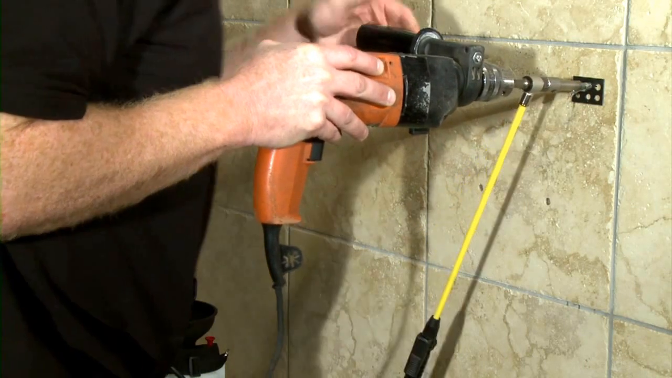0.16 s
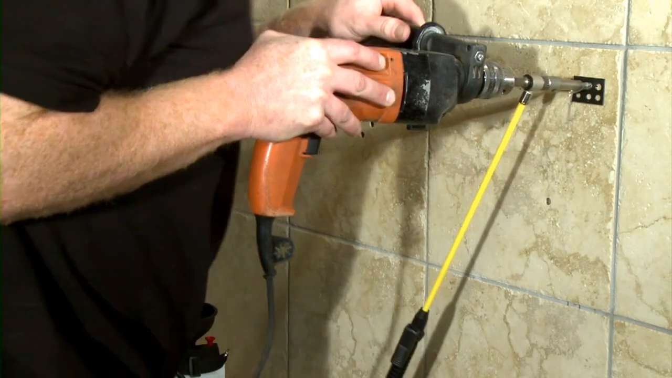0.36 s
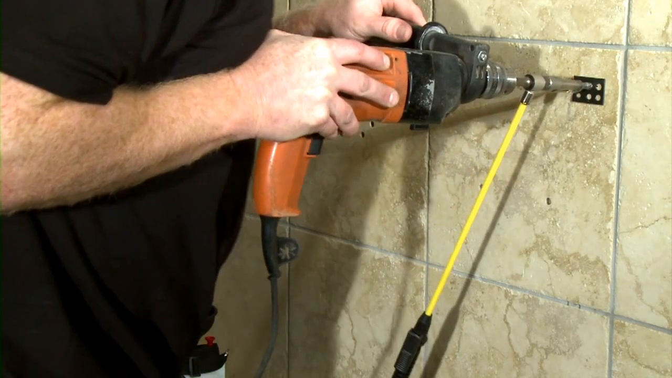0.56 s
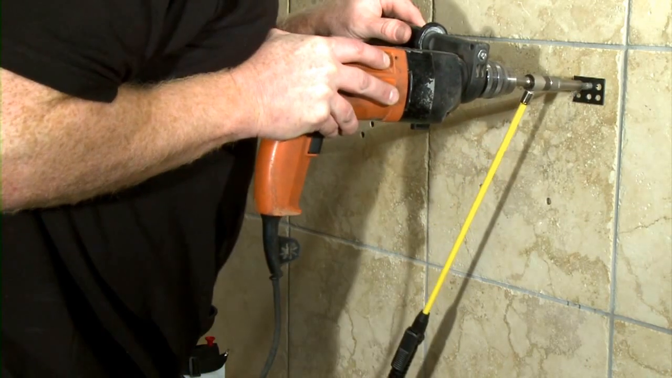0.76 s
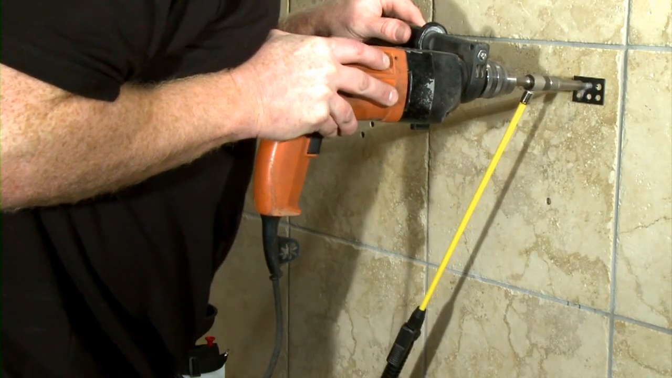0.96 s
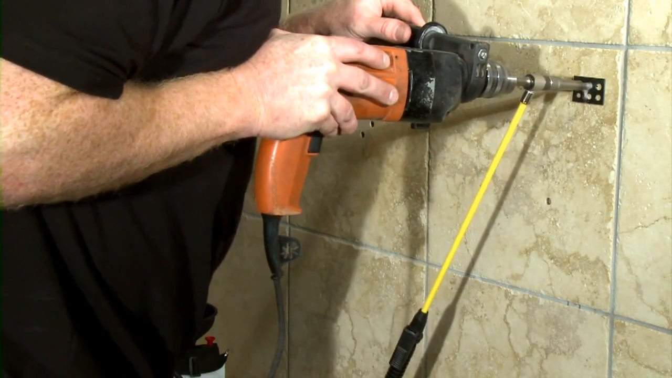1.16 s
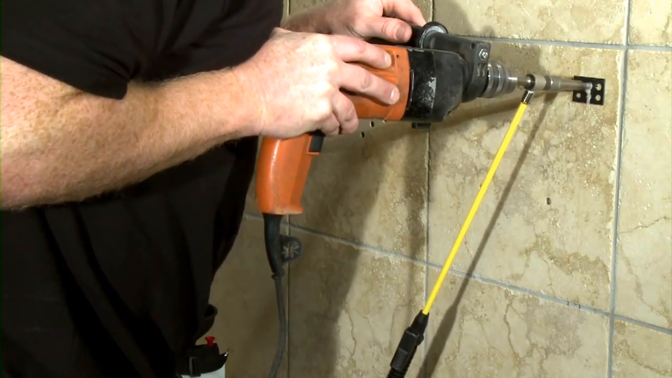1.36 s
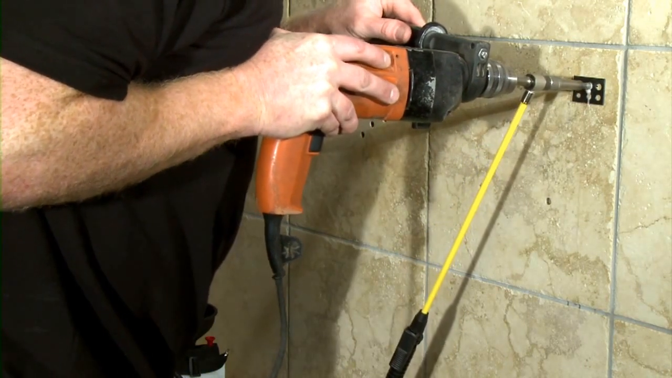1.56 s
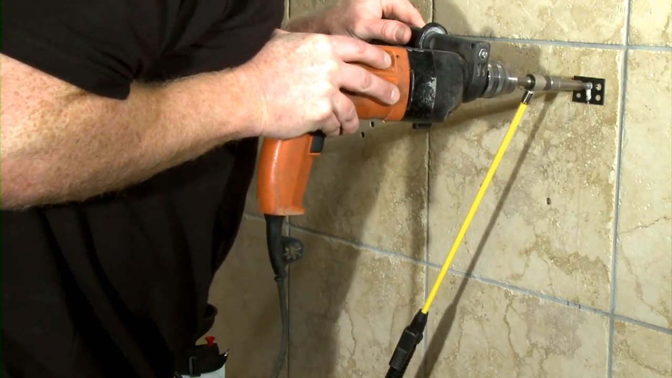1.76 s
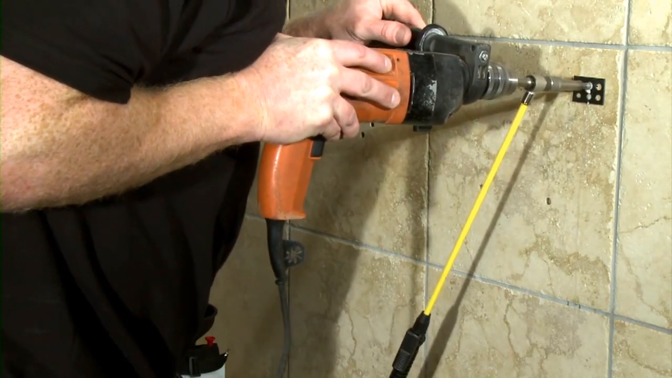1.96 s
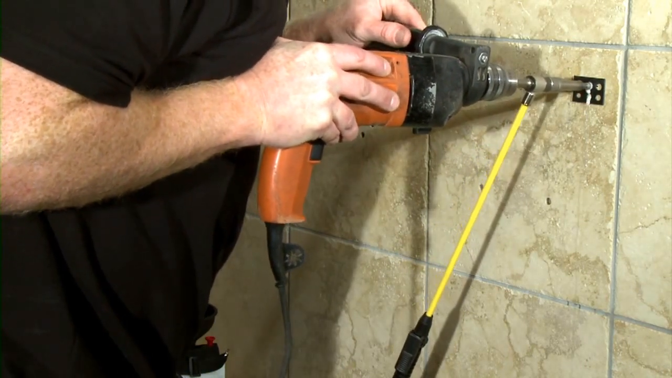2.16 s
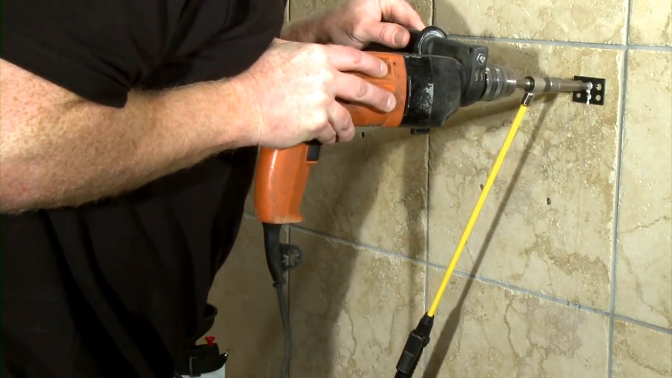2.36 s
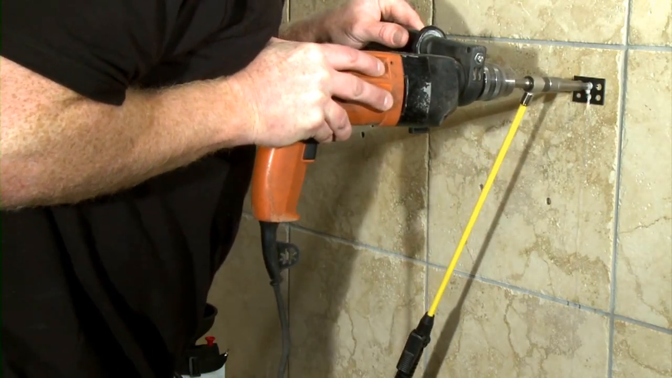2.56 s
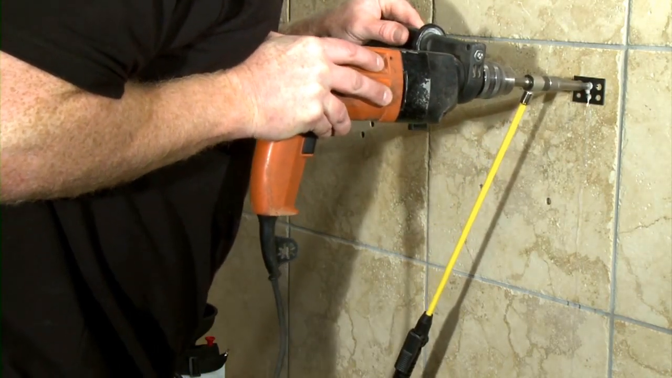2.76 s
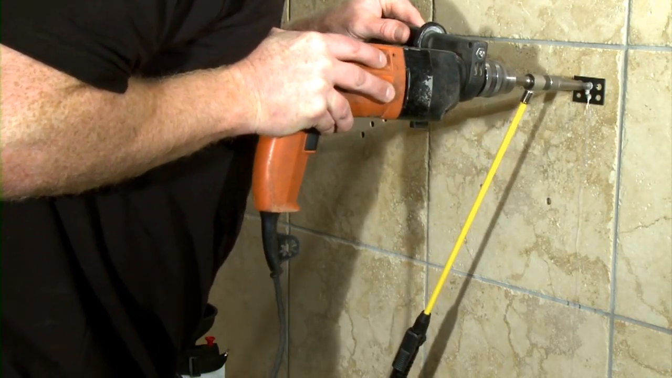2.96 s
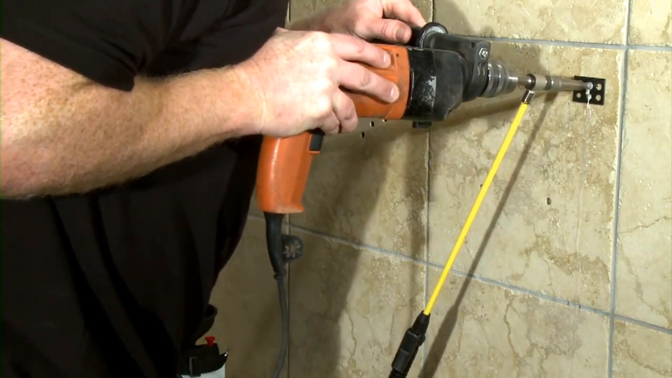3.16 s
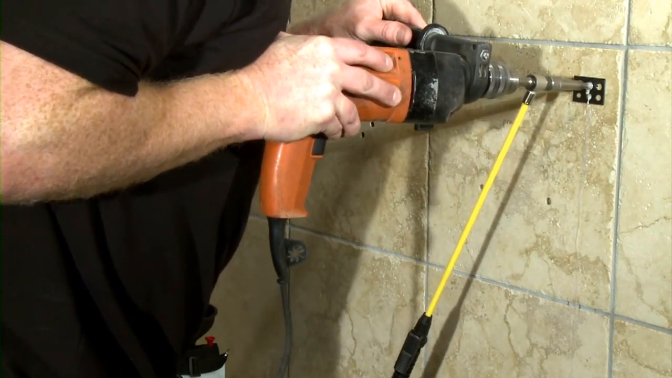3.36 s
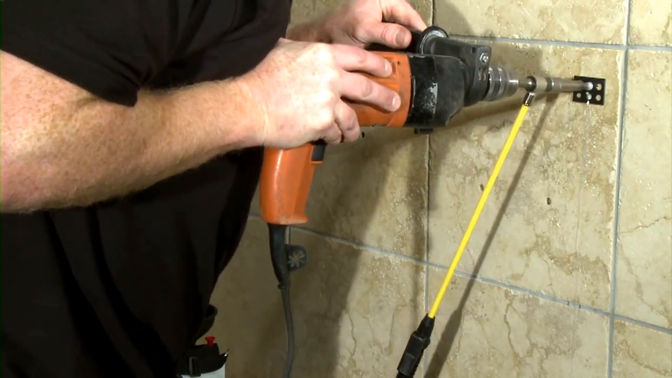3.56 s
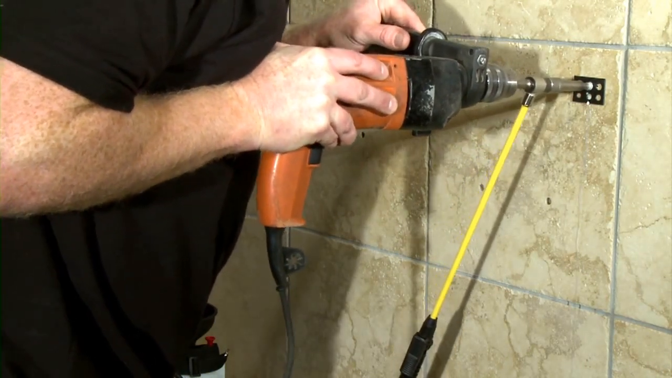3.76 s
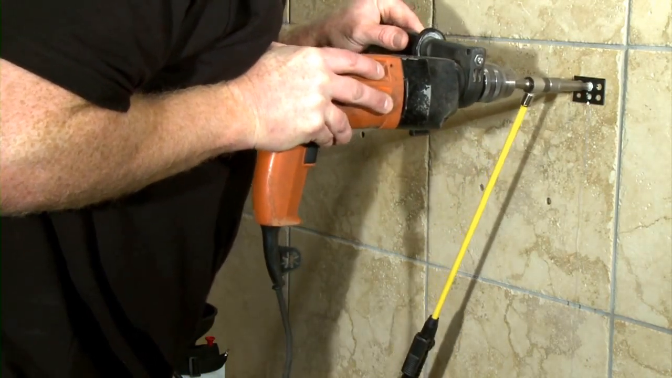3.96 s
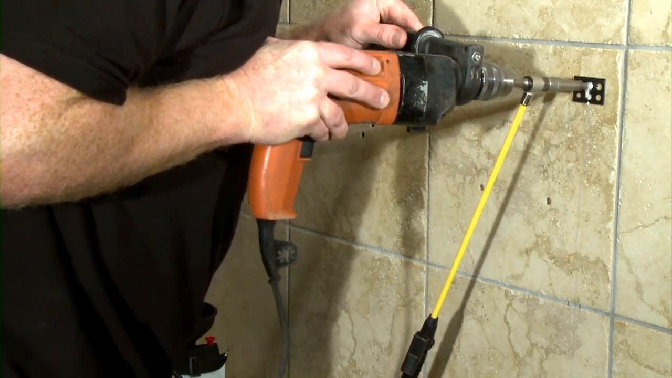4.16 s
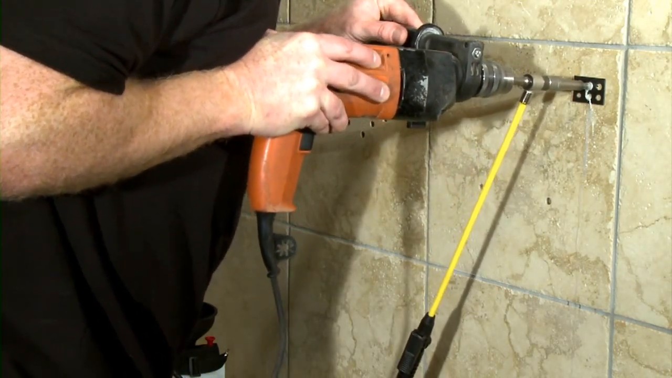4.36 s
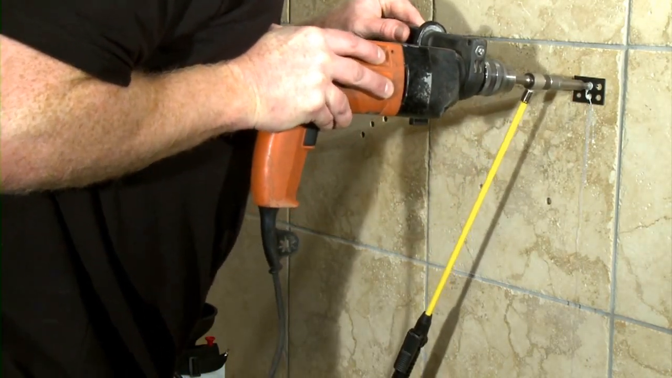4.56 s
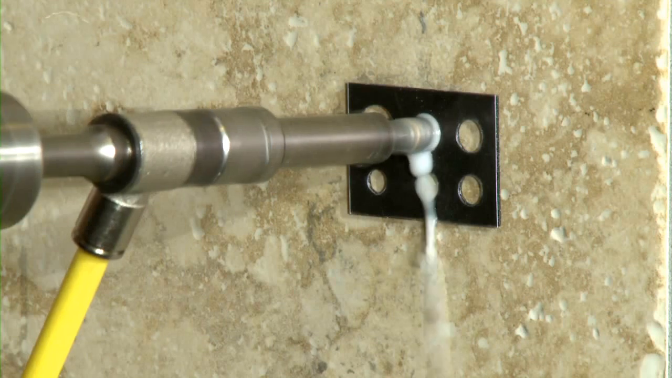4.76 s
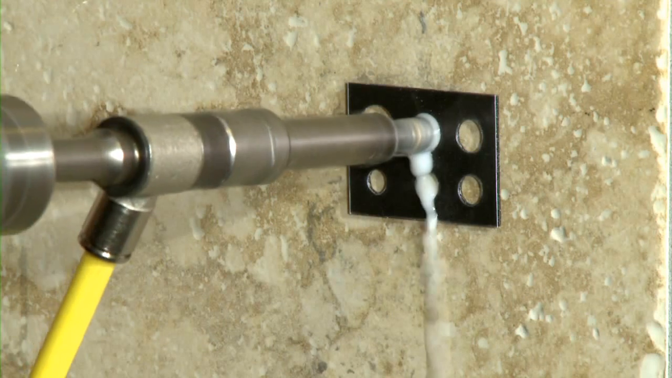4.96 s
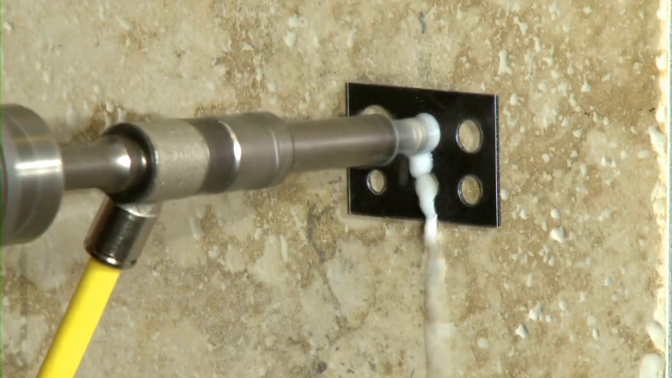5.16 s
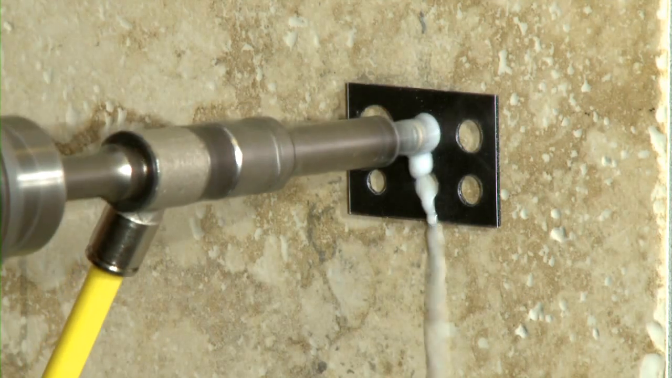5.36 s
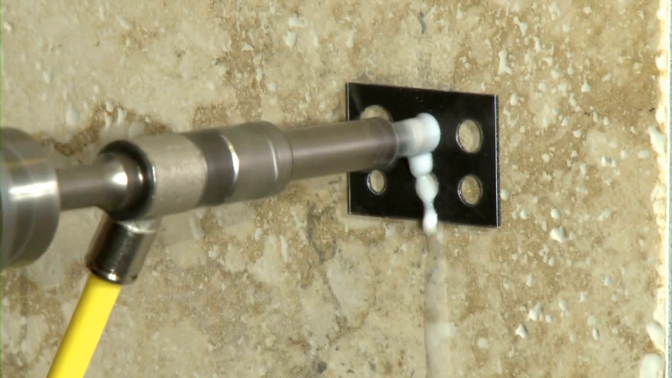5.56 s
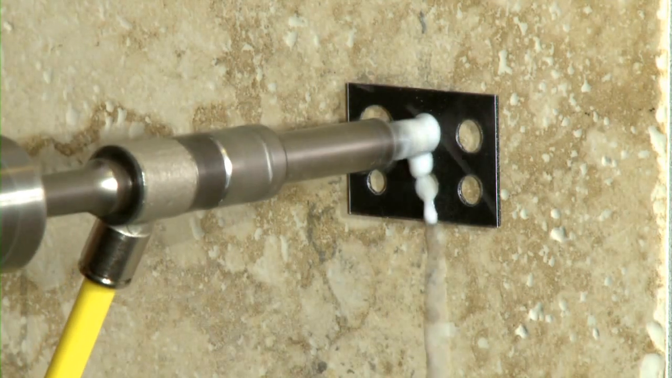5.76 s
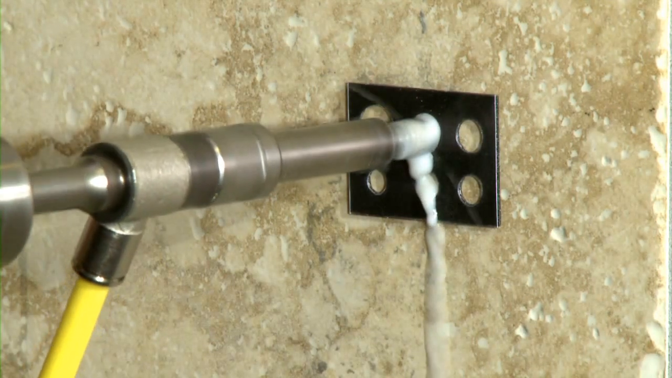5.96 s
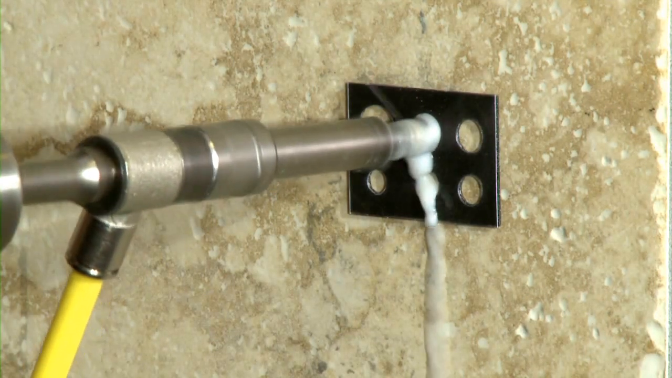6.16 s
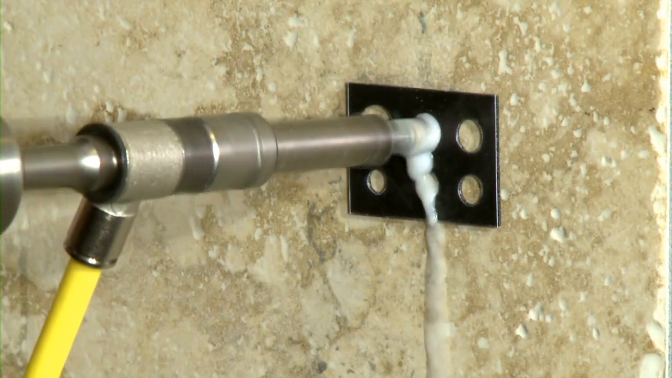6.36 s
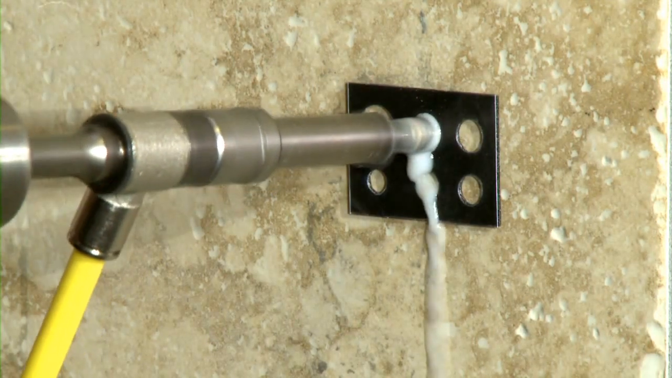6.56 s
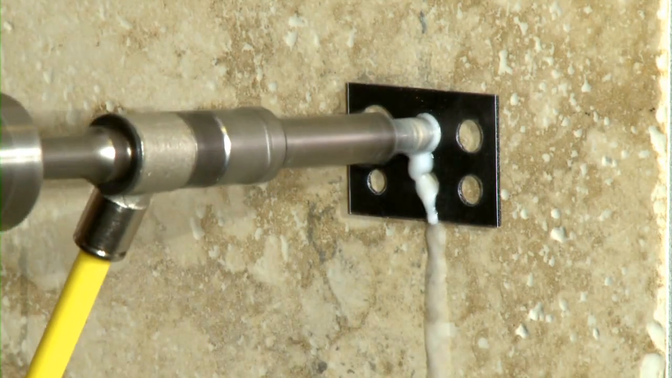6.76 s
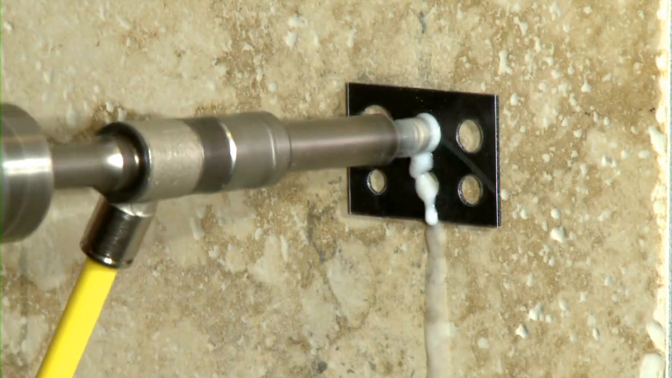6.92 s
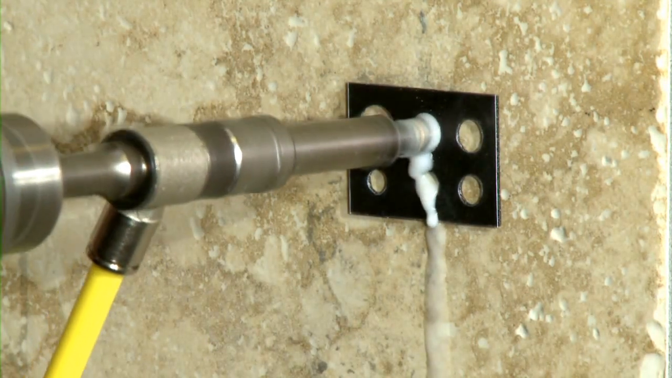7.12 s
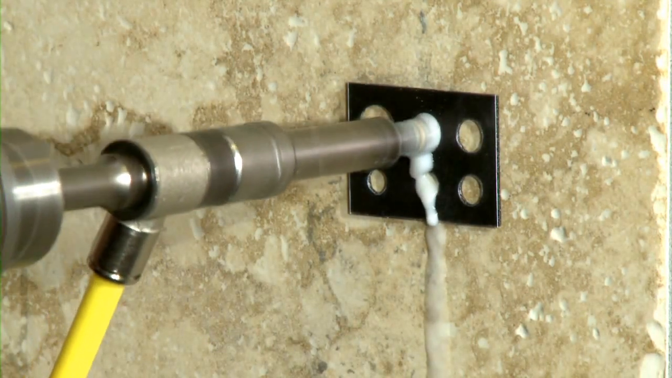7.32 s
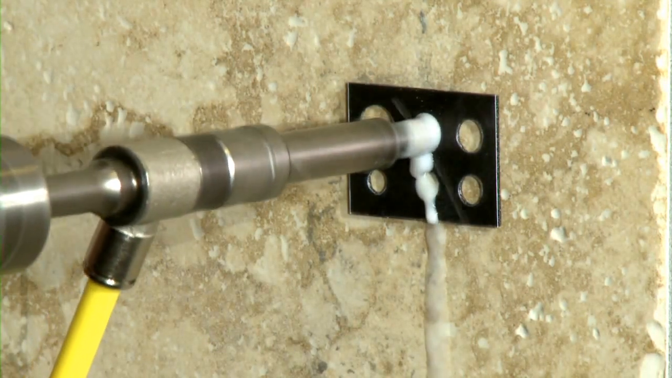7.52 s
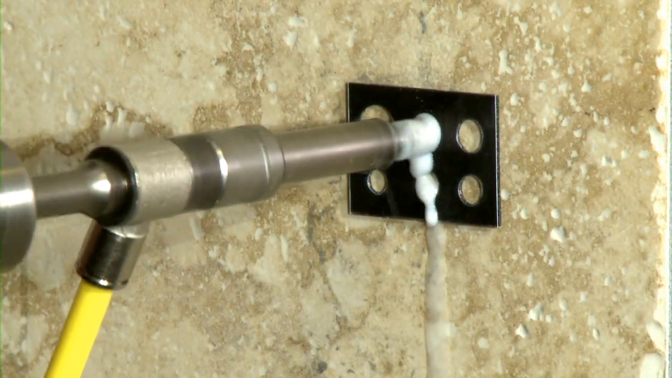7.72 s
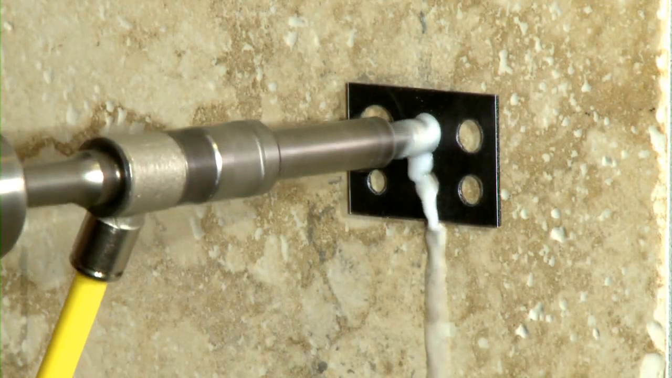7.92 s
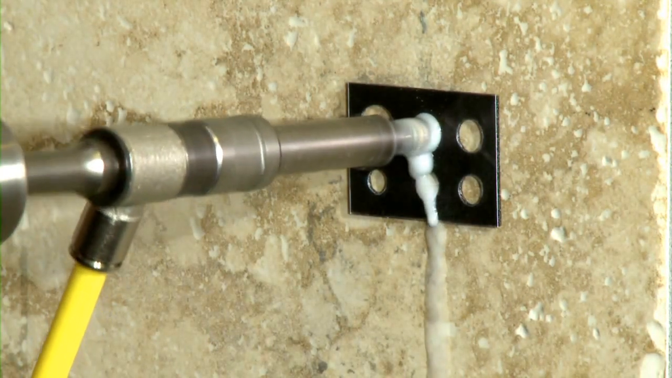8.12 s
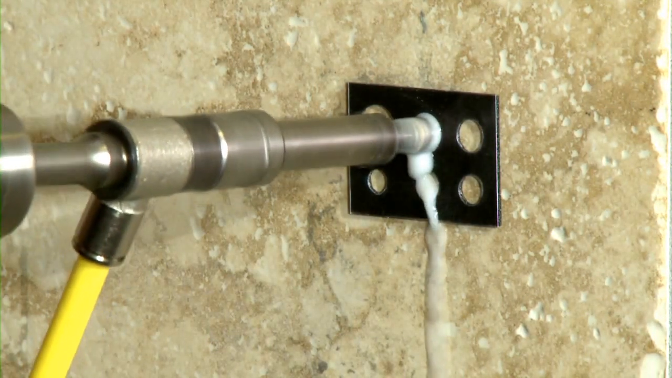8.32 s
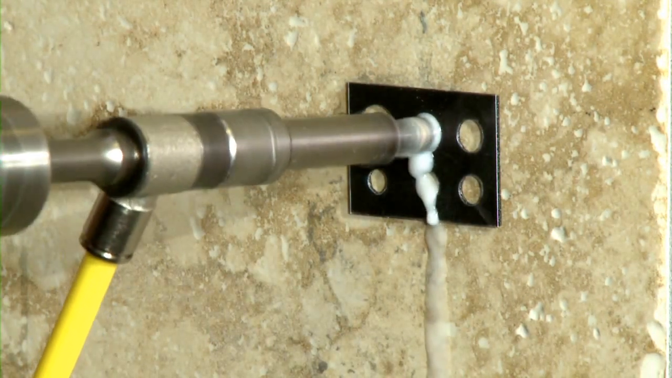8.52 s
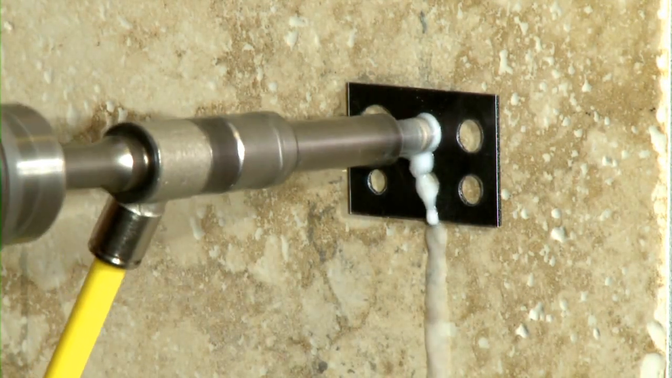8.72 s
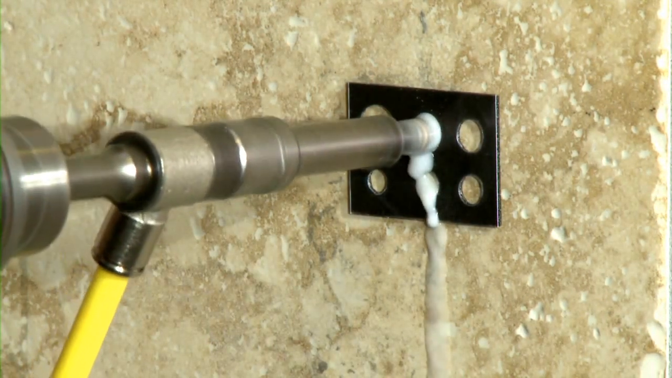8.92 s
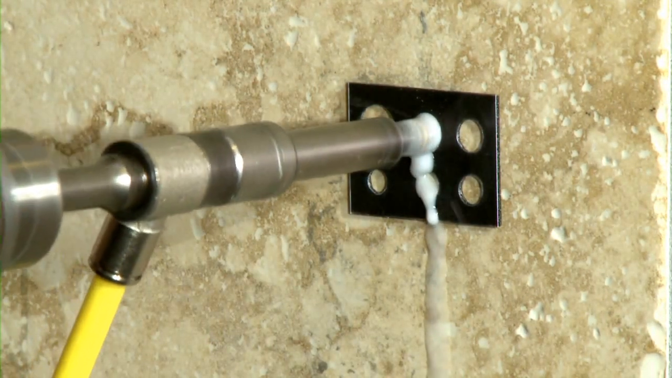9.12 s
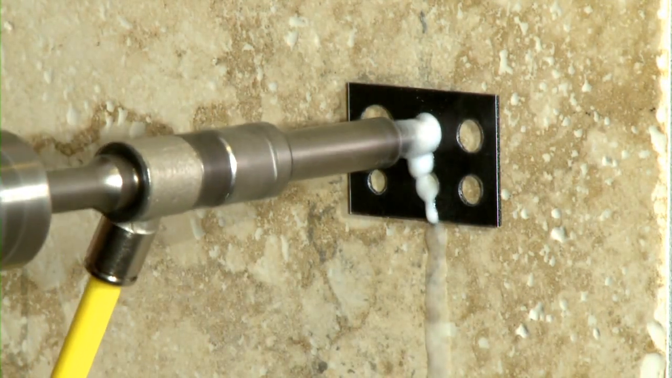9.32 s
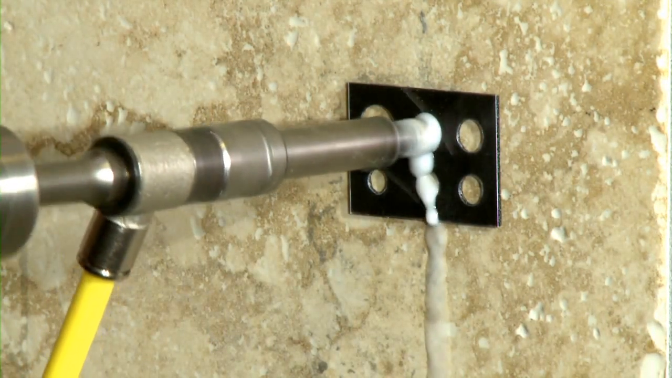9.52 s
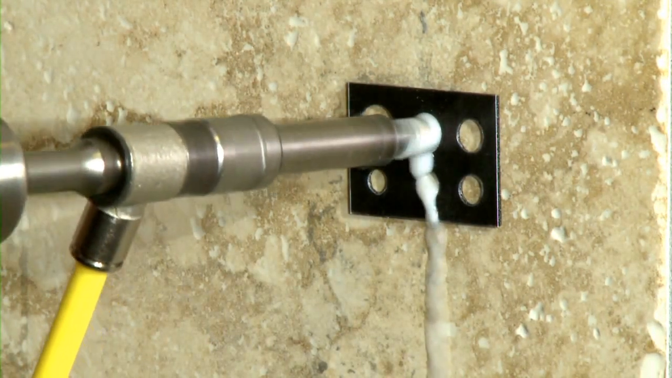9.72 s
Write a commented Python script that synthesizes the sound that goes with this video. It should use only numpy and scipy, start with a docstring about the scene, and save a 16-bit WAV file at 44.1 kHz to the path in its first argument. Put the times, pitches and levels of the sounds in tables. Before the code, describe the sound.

Close, mono sound of an electric drill on wall tile. Just over half a second of quiet room tone, soft water hiss and light clicks comes first; then the motor catches and sweeps upward, coarse gear rattle giving way to bright airy grinding. The pitch levels off and stays running, its shrill whistle swelling and fading unevenly, with a short hard echo from the walls and low vibration underneath.

```python
"""A mains drill spins up and grinds a water-fed diamond bit into a wall tile, close to a mono microphone.
Its gears whine and its fan whistles at 29 times the shaft speed: these are sine tones tied to the shaft.
Brushes, air and grit rush through the housing: noise that gets louder and brighter with speed.
The water feed hisses first; then the trigger clicks and the motor climbs to about 500 turns a second.
A quiet room with a faint hum lies underneath."""
import sys
import numpy as np
from scipy import signal
from scipy.fft import rfft, irfft, next_fast_len
from scipy.io import wavfile
from scipy.ndimage import uniform_filter1d, map_coordinates

SR = 44100
rng = np.random.default_rng(int(sys.argv[2]) if len(sys.argv) > 2 else 0)


def transcribe(signal):
    """Save signal, clipped to [-1, 1], as a 16-bit WAV file at the path in sys.argv[1]."""
    frames = np.atleast_2d(signal).T
    limited = np.clip(frames, -1, 1)
    pcm = np.round(limited * 32767).astype(np.int16)
    wavfile.write(sys.argv[1], SR, pcm)


N = 436149
TIME = np.arange(N) / SR  # seconds
START = .644  # the trigger closes (s)
FULL_HZ = 500  # shaft turns a second that count as full speed, where "speed" is 1
BLADES, TEETH = 29, 6  # fan blades, teeth on the motor's pinion


def amp(db):
    """Turn decibels into gain."""
    return 10 ** (np.asarray(db) / 20)


def unit(x):
    """Scale to an rms of 1."""
    return x / np.sqrt(np.mean(x ** 2) + 1e-20)


def curves(rows):
    """Join the rows by straight lines: one value per sample for each column after the time."""
    seconds, *columns = np.transpose(rows)
    return [np.interp(TIME, seconds, column) for column in columns]


def wobble(rate):
    """A smooth random curve through `rate` random points a second."""
    knots = rng.standard_normal(4096)
    coarse = TIME[::32]
    curve = map_coordinates(knots, [coarse * rate], mode="mirror")
    return np.interp(TIME, coarse, curve)


def filtered(x, response):
    """Multiply the spectrum of x by a response, a function of frequency in Hz."""
    m = next_fast_len(N + SR // 4, True)  # spare room keeps the end from wrapping to the start
    return irfft(rfft(x, m) * response(np.fft.rfftfreq(m, 1 / SR)), m)[:N]


def coloured(x, spectrum, resonances=()):
    """Shape x by (Hz, dB) points, lift it at (Hz, width, dB) resonances and scale to an rms of 1."""
    points_hz, points_db = np.transpose(spectrum)

    def response(hz):
        shape = np.interp(np.log(hz + 1), np.log(points_hz + 1), points_db)
        lift = sum(db / (1 + (2 * (hz - centre) / width) ** 2) for centre, width, db in resonances)
        return amp(shape + lift)

    return unit(filtered(x, response))


def white():
    """Fresh white noise."""
    return rng.standard_normal(N)


def tone(phase, smear, rate):
    """A sine of rms about 1 whose strength and phase flutter by the share smear."""
    in_step = (1 + smear * wobble(rate)) * np.sin(phase)
    out_of_step = smear * wobble(rate) * np.cos(phase)
    return np.sqrt(2 / (1 + 2 * smear ** 2)) * (in_step + out_of_step)


def drill():
    """One turning shaft drives every part except the mains hum, which keeps its own pitch."""
    turns, drag = motor()
    angle = 2 * np.pi * np.cumsum(turns) / SR
    speed = turns / FULL_HZ
    mains = 2 * np.pi * 2 * 50 * TIME  # two torque pulses in each cycle of the 50 Hz mains
    power = np.clip((TIME - START) / .012, 0, 1)
    strain = tiled_walls(power * gear_strain(angle, speed), t60=0.12, wet_db=-6)
    # the whistle has a fainter, slightly longer echo, which keeps it steadier
    whistle = tiled_walls(fan_whistle(angle, speed, mains), t60=.15, wet_db=-10)
    close = gear_whine(angle, speed, drag) + grinding(angle, speed) + shaking(speed, mains)
    return strain + whistle + power * close


def motor():
    """Shaft speed and drag (turns a second): a smooth run-up that levels off, less the drag."""
    free_hz, spin_up_s, head_start_s = 509, .59, .015  # run-up's final speed, time constant, lead at switch-on
    # Drag curve. Each row: time in seconds, turns a second below the smooth run-up (negative = above it).
    drag_curve = [(.65, 3), (.88, -9), (1.01, 6.5), (1.2, 6), (1.5, -7), (1.85, 2), (2.6, -2), (3.4, 1),
                  (3.75, 4.5), (4.6, 5), (6.1, 9), (9.89, 9)]
    # the bit grips unevenly: a random swing in turns a second, 2.5 changes a second
    drag = curves(drag_curve)[0] + .7 * wobble(2.5)
    free = free_hz * (1 - np.exp(-(TIME - START + head_start_s) / spin_up_s))
    turns = uniform_filter1d((free - drag).clip(0), SR // 20)
    return turns.clip(0), drag


def gear_whine(angle, speed, drag):
    """Shaft imbalance, pinion teeth, rotor and slipping bearings; drag changes the hum and mesh levels."""
    # Shaft hum, then gear mesh. Each row: level in dB at full speed without drag, power of speed,
    # change in dB for each turn a second of drag.
    gears = [(-37.5, 3.4, -0.7), (-38, 1.9, 0.47)]
    # Tone at three times the shaft speed. Each row: time in seconds, level in dB, all lowered by 0.5 dB.
    half_mesh = [(2.7, -36.5), (4.08, -37.5), (4.54, -31), (5.46, -41), (5.66, -37), (6.14, -43),
                 (6.18, -37), (9.89, -40.5)]
    # Weaker rotor tones. Each row: whole multiple of the shaft speed, level in dB at full speed.
    rotor_tones = [(7, -38), (8, -35), (12, -43), (13, -39), (23, -45.5), (24, -61), (26, -47), (30, -48)]
    # Ball bearings. Each row: multiple of the shaft speed, level in dB at full speed, all lowered by 0.5 dB.
    bearings = [(2.19, -41.5), (7.42, -48), (7.59, -42), (8.59, -35), (9.31, -32)]
    twist = angle + 0.016 * wobble(30)  # the load twists the shaft to and fro
    hum, mesh = [speed ** grows * amp(db + per_drag * drag.clip(0) + 0.79 * wobble(6.5))
                 for db, grows, per_drag in gears]
    # the shaft hum dips by 14 dB as it passes 483.5 turns a second
    dip = amp(-14 * np.exp(-((speed * FULL_HZ - 483.5) / 13.5) ** 2))
    half = speed ** 2.6 * amp(curves(half_mesh)[0] - 0.5 + 0.93 * wobble(8))
    main = hum * dip * tone(twist, smear=0.09, rate=22)
    main += half * tone(TEETH / 2 * twist, smear=0.21, rate=70)
    main += mesh * tone(TEETH * twist, smear=0.13, rate=70)
    rotor = sum(amp(db + 0.41 * wobble(2.94)) * tone(round(k) * twist, smear=0.2, rate=25)
                for k, db in rotor_tones)
    balls = sum(amp(db + 0.73 * wobble(3.04)) * tone(k * twist, smear=1.1, rate=90)
                for k, db in bearings)
    return main + speed ** 7.3 * rotor + speed ** 6.7 * amp(-0.5) * balls


def fan_whistle(angle, speed, mains):
    """The blades need some air speed to sing; mains torque ripple and the turning chuck sway the phase."""
    # It swells and fades as the drill sways. Each row: time in seconds, level in dB, all lowered by 0.5 dB.
    whistle_levels = [(2.55, -30), (2.69, -23), (2.94, -36), (3.02, -24), (4.0, -30), (4.1, -40),
                      (4.74, -28), (4.94, -32), (5.1, -23), (5.8, -38), (5.9, -21), (6.33, -28),
                      (6.41, -39), (6.58, -32), (7.41, -33), (7.48, -22.5), (7.82, -24), (7.95, -31),
                      (8.38, -32), (8.62, -27), (8.82, -39), (9.24, -20), (9.77, -38), (9.89, -29)]
    blade, chuck = BLADES * angle, angle / BLADES
    sway = .38 * np.sin(mains) + .35 * np.sin(chuck)
    blowing = np.clip((speed - .33) / 0.081, 0, 1) * speed ** 0.56
    level_db = curves(whistle_levels)[0] - 0.5 + 0.8 * wobble(10)  # lowered by 0.5 dB, with a quick random swing
    level_db = np.minimum(level_db, -20)  # the whistle's level stops at -20 dB
    return blowing * amp(level_db) * tone(blade + sway, smear=0.21, rate=70)


def grinding(angle, speed):
    """Brush scrape gives way to rushing air and grit as speed grows; both pulse with the shafts."""
    # Air and grinding, before speed changes the balance. Each row: frequency in Hz, relative dB per Hz.
    rush_spectrum = [(250, -23.5), (330, -22), (450, -10), (700, -9), (1000, -4.5), (1500, -7.5),
                     (2000, -9), (2800, -4), (4000, 0.0), (5200, -1.16), (7000, -4), (9000, -10),
                     (12000, -10.5), (14500, -10), (15500, -15.5)]
    # Brushes on the slowly turning commutator. Each row: frequency in Hz, relative dB per Hz.
    scrape_spectrum = [(180, -22), (300, -24), (431, -3), (500, -20), (590, -5), (794, -21), (1350, -16),
                       (1510, -12.5), (2400, -13), (2830, -10.5), (4720, -7), (5850, -18), (15500, -37)]
    # Resonances of housing, bit and tile. Each row: frequency in Hz, width in Hz, lift in dB.
    housing = [(460, 30, -0.5), (793, 27, 3.5), (1165, 73, 4), (1438, 106, 7), (1741, 58, 7),
               (2370, 89, 2.5), (2810, 360, 3.5), (3170, 47, 1.5), (3736, 210, 4.5), (4100, 49, 5),
               (4710, 600, 2), (5030, 190, 2), (5960, 99, 4.5), (6500, 110, 6.5), (7040, 106, 3),
               (7540, 220, 4), (8010, 130, 4.5), (9030, 340, 3.2), (10130, 490, 5), (11400, 180, 3.5)]
    counter = 6 / 29 * angle  # the geared-down countershaft
    pulsing = 1 + 0.05 * np.sin(angle) + 0.014 * np.sin(counter) + .03 * np.sin(2 * counter)
    grit = white() * amp(0.23 * wobble(400)) * pulsing
    rush = coloured(grit, rush_spectrum, housing)
    # split the rush: body below about 2900 Hz, fizz above about 8500 Hz, rasp between
    body = filtered(rush, lambda hz: 1 / (1 + (hz / 2900) ** 6))
    fizz = filtered(rush, lambda hz: 1 - 1 / (1 + (hz / 8500) ** 10))
    rasp = rush - body - fizz
    fast = amp(-19.5) * speed ** 1.1 * body
    fast += amp(-20) * speed ** 1.7 * (rasp + fizz * speed)  # the top grows fastest
    scrape = coloured(white() * pulsing, scrape_spectrum, housing)
    slow = amp(-23) * speed ** .95 * scrape
    share = np.clip((speed - .25) / 0.65, 0, 1)
    return np.sqrt(share) * fast + np.sqrt(1 - share) * slow


def gear_strain(angle, speed):
    """Around half speed the teeth rattle in rough rising lines; single shaft tones swell and pass."""
    # Rattling teeth as the motor accelerates. Each row: whole multiple of the shaft speed, peak level in dB.
    rattle_tones = [(6, -49), (11, -47), (12, -39.5), (17, -46), (18, -35.5), (19, -45), (24, -45)]
    # Passing shaft tones. Each row: multiple of the shaft speed, share of full speed where loudest,
    # level in dB there.
    drone_tones = [(1, 0.57, -51), (1.44, 0.79, -43.5), (2, 0.93, -41.5), (3, 0.71, -46), (5, 0.92, -43)]
    rattle = sum(amp(db) * tone(round(k) * angle, smear=1.2, rate=220) for k, db in rattle_tones)
    drone = sum(amp(db) * np.exp(-((speed - loudest) / 0.074) ** 2) * tone(k * angle, smear=0.7, rate=35)
                for k, loudest, db in drone_tones)
    return np.exp(-((speed - .46) / 0.1) ** 2) * rattle + drone


def shaking(speed, mains):
    """Low vibration, and the stator's hum, strongest while the slow motor draws most current."""
    # The shaking drill and wall. Each row: frequency in Hz, relative dB per Hz.
    rumble_spectrum = [(29, -36), (50, -3.5), (103, -3.5), (151, -11), (212, 1.5), (257, -6.5), (286, -3),
                       (319, -8.5), (384, -6.5), (420, -0.5), (550, -26), (920, -120)]
    hum = amp(-48.0 - 25 * speed ** 3) * tone(mains, smear=0.48, rate=8.0)
    rumble_level = amp(-46.5 - 2.7 * speed + 0.41 * wobble(4))
    return hum + rumble_level * coloured(white(), rumble_spectrum)


def tiled_walls(x, t60, wet_db):
    """The direct sound plus a short dense echo from hard walls, which falls by 60 dB in t60 seconds."""
    t = TIME[:SR // 2]
    tail = rng.standard_normal(len(t)) * amp(-60 * t / t60) * (t > .002)
    return x + amp(wet_db) * signal.fftconvolve(x, tail / np.linalg.norm(tail))[:N]


def water():
    """Water hisses through the narrow pipe, softer and duller once the first spurt has passed."""
    # The water jet. Each row: frequency in Hz, relative dB per Hz.
    jet = [(590, -35), (1000, -5), (1230, -6), (1680, -9), (2620, -10), (5000, -9), (5730, -13),
           (15000, -35)]
    # Resonances of the pipe. Each row: frequency in Hz, width in Hz, lift in dB.
    pipe = [(2640, 80, 16), (4990, 110, 12), (6900, 350, 9), (12300, 300, 6)]
    since = (TIME - .21).clip(0)  # seconds since the feed opened
    opening = np.clip(since / .04, 0, 1)
    flow = opening * amp(-57.5 - 13 * since + 1.2 * wobble(124))  # loses 13 dB a second
    hiss = coloured(white(), jet, pipe)
    dull = filtered(hiss, lambda hz: 1 / (1 + (hz / 4500) ** 2))
    spurt = np.clip((.6 - TIME) / .3, .4, 1)
    return flow * (spurt * hiss + (1 - spurt) * dull)


def trigger():
    """Fingers on the trigger: short plastic clicks, noise bursts that start at once and die away."""
    # Each row: time in seconds, level in dB at the start of the click.
    clicks = [(.469, -62), (.611, -60), (.644, -43.5)]
    blows = sum((TIME >= s) * amp(db - 60 * np.abs(TIME - s) / .035) for s, db in clicks)
    return blows * coloured(white(), [(300, -4), (3500, 4), (8000, -11), (15000, -17)])


def room():
    """Quiet air as shaped noise, with a faint steady-pitched hum."""
    # The still room. Each row: frequency in Hz, relative dB per Hz.
    air = [(12, -29), (20, -1.5), (100, -8), (128, -3), (155, -11), (199, -5.5), (270, -10.5), (398, -14),
           (914, -20), (1240, -26), (1390, -27), (2690, -27.5), (15000, -57)]
    # The faint hum. Each row: frequency in Hz, level in dB.
    hum_tones = [(27, -65), (100, -62), (200, -64.5), (1206, -69)]
    hum = sum(amp(db) * tone(2 * np.pi * hz * TIME, smear=0.83, rate=7.1) for hz, db in hum_tones)
    return hum + amp(-51.5) * coloured(white(), air)


def scene():
    """One microphone feeds both channels."""
    return np.tile(drill() + water() + trigger() + room(), (2, 1))


def record(dry):
    """The recorder keeps nothing from 15750 Hz upwards."""
    return np.array([filtered(channel, lambda hz: hz < 15750) for channel in dry])


dry = scene()
out = record(dry)
transcribe(out)
```